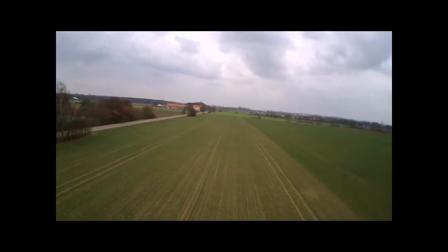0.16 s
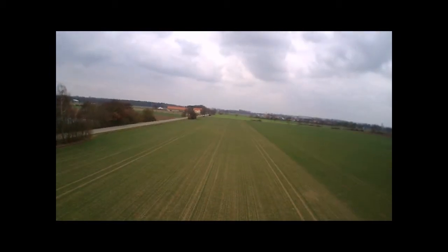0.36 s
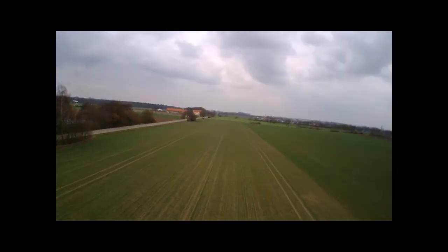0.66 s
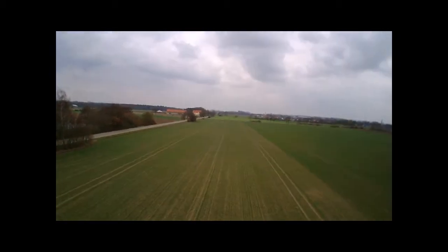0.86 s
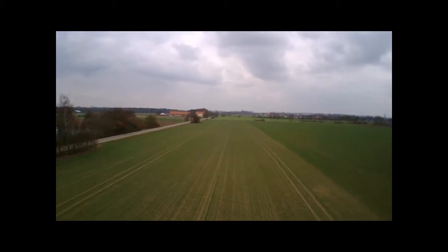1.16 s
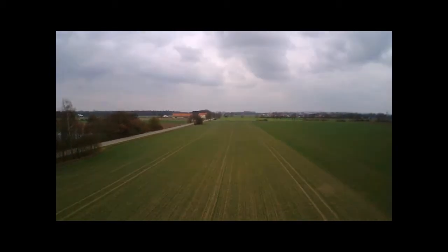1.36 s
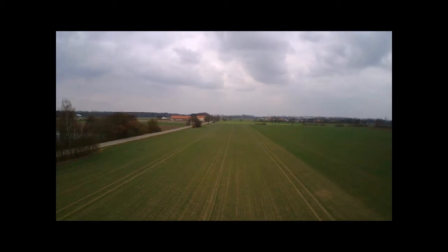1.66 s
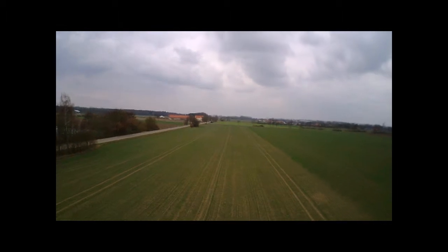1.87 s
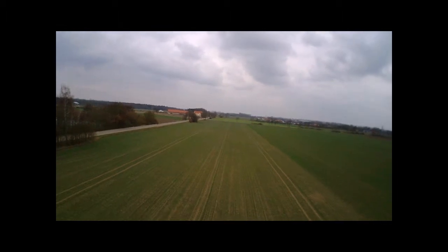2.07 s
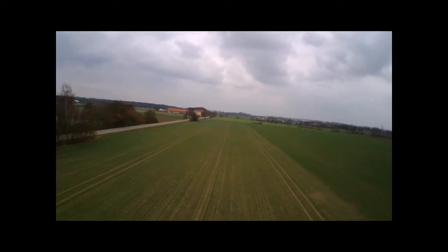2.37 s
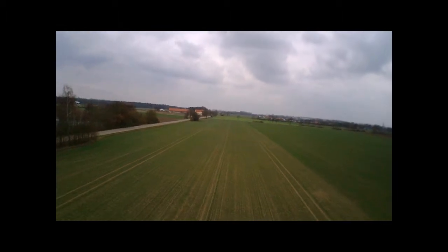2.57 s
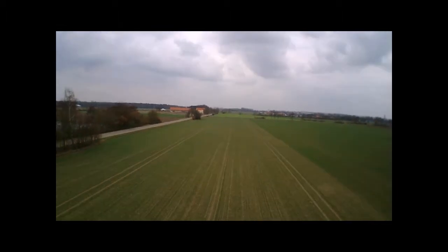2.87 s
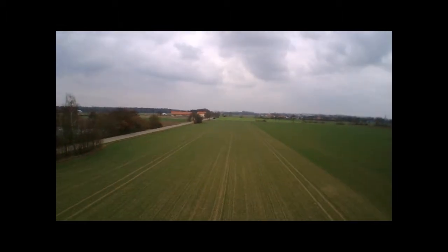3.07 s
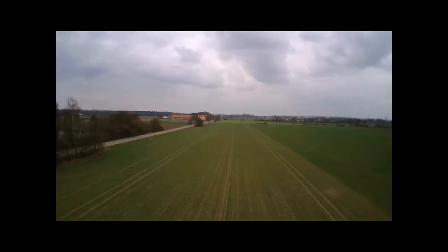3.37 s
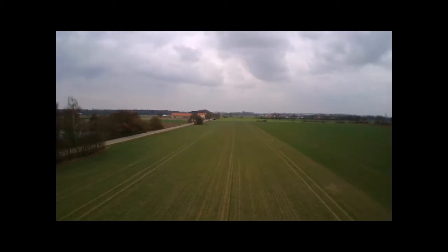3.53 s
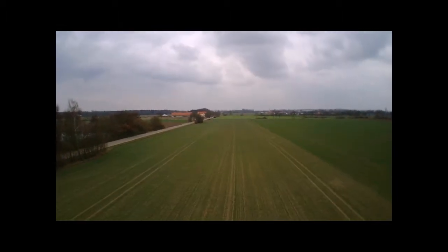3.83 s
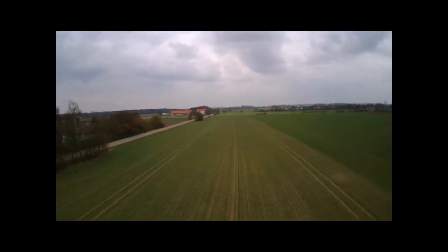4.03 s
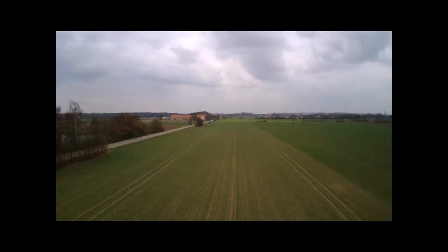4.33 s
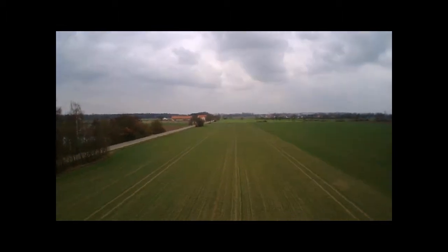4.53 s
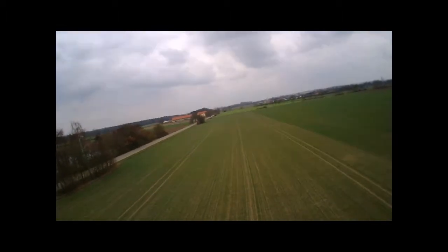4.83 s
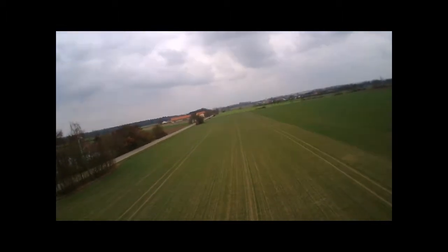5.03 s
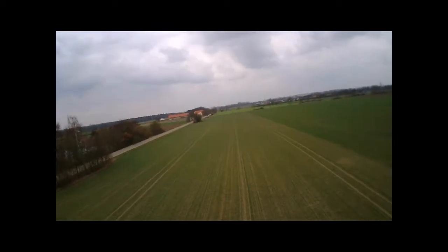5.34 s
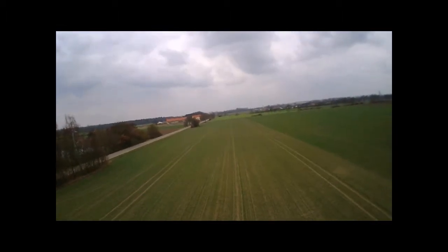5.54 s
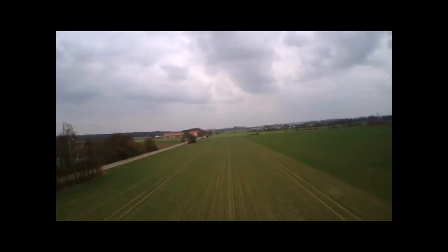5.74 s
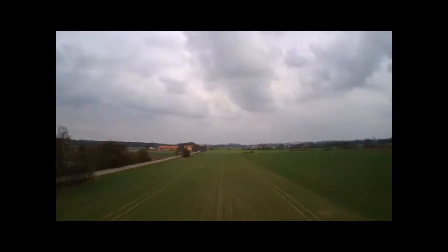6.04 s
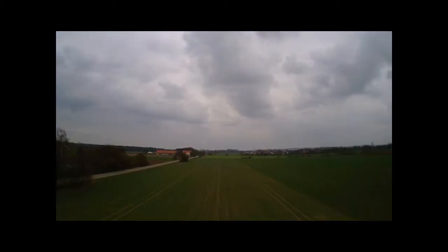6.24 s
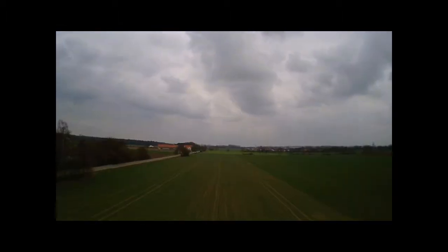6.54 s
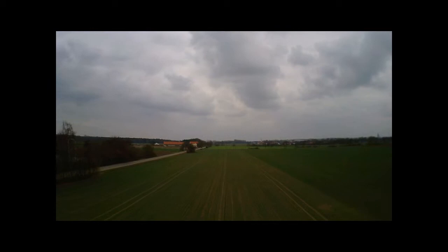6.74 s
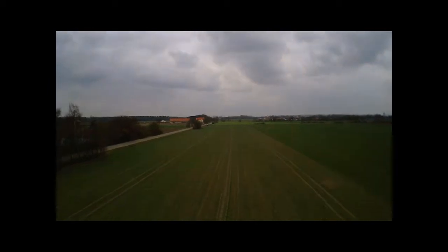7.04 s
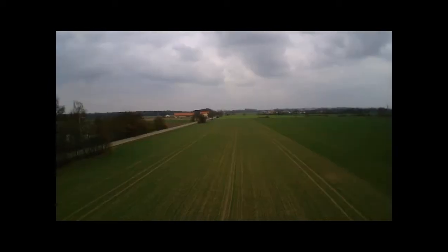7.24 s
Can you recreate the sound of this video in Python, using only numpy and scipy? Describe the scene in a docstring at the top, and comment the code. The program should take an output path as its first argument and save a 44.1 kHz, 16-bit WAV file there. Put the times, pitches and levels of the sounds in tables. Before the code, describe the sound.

For about 7.4 seconds a quadcopter drone flies over open fields, heard very close from the camera on its frame. Four two-bladed rotors give a steady low hum around 130 to 150 Hz, slightly detuned so they beat and throb, with buzzing overtones, noisy blade wash and a hoarse rasp around 2 kHz. From 0 to 1.5 s the pitches shift restlessly, with brief wind puffs and a cluster of tiny mount ticks near 0.85 s. It is calmer around 2.3 s, with a faint tick, then a rougher swell near 3 s. A click at 4.7 s precedes a quick steering wobble and a puff; another tick comes at 5.9 s. Near 6.3 s the hum dips sharply and surges back as some motors speed up. A gust and double tick arrive at 7.1 s, and the buzz continues to the end. Dry, muffled treble, faint hiss and overload crackle.

```python
"""Four two-bladed rotors of a quadcopter over open fields, heard from the camera on its frame.
They turn at slightly different speeds and beat: sine hum, overtones through the frame, and a rasp
shaken out of the housing at each blade pass. Filtered noise makes the blade wash and a little wind;
damped sines make the ticks of the mount. The loudest crests overload the recorder."""
import sys
import numpy as np
from scipy import signal
from scipy.fft import rfft, irfft, next_fast_len
from scipy.io import wavfile

SR = 44100
rng = np.random.default_rng(int(sys.argv[2]) if len(sys.argv) > 2 else 0)


def dump(signal):
    """Clip the signal to [-1, 1] and save it as 16-bit WAV at the path in sys.argv[1]."""
    limited = np.clip(np.atleast_2d(signal).T, -1, 1)
    pcm = np.round(limited * 32767).astype(np.int16)
    wavfile.write(sys.argv[1], SR, pcm)


N = 326340
MIC_TOP_HZ = 3960


def from_db(db):
    """Decibels to gain."""
    return 10 ** (np.asarray(db) / 20)


def rms_one(x):
    """Scale to unit rms."""
    return x / np.sqrt(np.mean(x ** 2) + 1e-20)


def level_db(curve):
    """Interpolate a (time [s], level [dB]) curve at every sample."""
    time_s, db = np.transpose(curve)
    return np.interp(np.arange(N) / SR, time_s, db)


def drift(rate_per_s):
    """Slow random curve of unit rms: noise through two equal one-pole low-passes at SR / 40."""
    pole = np.exp(-80 * np.pi * rate_per_s / SR)
    noise = rng.standard_normal(N // 40 + 2002)
    slow = signal.lfilter([1], [1, -2 * pole, pole * pole], noise)[2000:]  # drop the settling
    return np.interp(np.arange(N) / 40, np.arange(len(slow)), rms_one(slow))


def coloured(x, spectrum):
    """Filter by a (frequency [Hz], gain [dB]) table, interpolated over log frequency."""
    size = next_fast_len(N)
    hz, db = np.transpose(spectrum)
    bins_hz = np.maximum(np.arange(size // 2 + 1) * SR / size, 1)
    gain = from_db(np.interp(np.log(bins_hz), np.log(hz), db))
    return irfft(rfft(x, size) * gain, size)[..., :N]


def push(middle_s, length_s):
    """A smooth rise from 0 to 1 and back (cosine squared)."""
    phase = np.clip((np.arange(N) / SR - middle_s) / length_s, -.5, .5)
    return np.cos(np.pi * phase) ** 2


def rotor_speeds():
    """Cruise speed plus steering corrections, in turns per s; one row per rotor."""
    # level flight: (rotors 1 to 4 [turns/s])
    cruise_hz = [64.272, 68.021, 73.592, 76.204]
    # smooth steering pushes: (middle [s], length [s], change of rotors 1, 2, 3, 4 [turns/s])
    corrections = [(0.0, 0.78, -2.17, 2.46, -1.22, -6.42), (0.58, 1.41, 4.38, -3.28, -1.4, -3.11),
                   (1.01, 0.56, -2.25, -0.96, -4.73, 1.39), (1.03, 1.13, 0.79, 1.76, 0.8, -3.14),
                   (1.41, 0.41, -0.5, -2.2, -0.58, -0.51), (2.17, 0.64, 2.55, 1.35, 0.68, 0.13),
                   (2.4, 1.96, 0.89, 1.29, -0.71, -0.9), (3.39, 1.07, -1.67, -1.04, -0.34, -1.27),
                   (4.43, 0.76, -0.87, 0.66, -0.9, -0.45), (4.82, 0.46, -3.22, -2.62, -1.85, 2.92),
                   (5.69, 1.54, 0.74, -1.09, -1.68, -2.38), (6.28, 1.11, -1.25, -0.42, 1.53, 5.39),
                   (6.33, 2.2, 7.34, 4.54, -1.45, -3.24), (7.14, 0.8, 1.42, 4.61, 3.63, 2.42)]
    speeds_hz = np.array(cruise_hz)[:, None]
    for middle_s, length_s, *change_hz in corrections:
        speeds_hz = speeds_hz + np.outer(change_hz, push(middle_s, length_s))
    return speeds_hz


def rotor_angle(speed_hz):
    """Integrated speed; the motor hunts ahead of and behind its commanded turn."""
    hunt_rad, hunts_per_s = 0.064, 3.5
    return 2 * np.pi * np.cumsum(speed_hz) / SR + hunt_rad * drift(hunts_per_s)


def blade_tone(angle, flutter_db):
    """Two blades pass per turn and push out a nearly pure hum."""
    return np.sqrt(2) * np.sin(2 * angle) * from_db(flutter_db * drift(2.4))


def frame_shake(angle, imbalance_db, flutter_db, wobble_rad):
    """Overtones of one rotor with jittered phase; unequal blades set the level of the odd orders."""
    # frame vibration from one rotor: (multiple of turning rate [1], relative level [dB])
    orders = [(1, -47.5), (3, -32), (4, -30), (5, -29.5), (6, -32), (7, -36.5), (8, -34.5), (9, -47),
              (10, -40.5), (11, -50.5), (12, -51.5), (13, -68.5), (14, -56), (15, -60), (16, -48),
              (17, -59), (18, -57), (19, -56.5), (20, -45)]
    shake = np.zeros(N)
    angle = angle + wobble_rad * drift(19)
    for order, db in orders:
        gain = from_db(db + imbalance_db * (order % 2) + flutter_db * drift(5.8))
        shake += np.sqrt(2) * gain * np.sin(order * angle + rng.uniform(0, 2 * np.pi))
    return shake


def blade_rasp(angle, sharpness, unequal, rough, orders=60):
    """A burst at each blade pass: partly the same chatter every turn, partly fresh turbulence."""
    turn = rms_one(irfft(np.exp(2j * np.pi * rng.random(orders)), 1024))
    chatter = np.interp(angle / (2 * np.pi) % 1, np.linspace(0, 1, len(turn)), turn)
    lowpass = signal.butter(2, MIC_TOP_HZ, fs=SR, output="sos")
    turbulence = rms_one(signal.sosfilt(lowpass, rng.standard_normal(N)))
    burst = np.exp(sharpness * np.cos(2 * angle) + unequal * np.cos(angle))
    return rms_one(burst * (chatter + rough * turbulence))


def blade_wash():
    """Turbulent wash of the blades: noise through a fixed spectrum."""
    # colour of the wash: (frequency [Hz], relative density [dB per Hz])
    wash_colour = [(60, -23), (180, -17), (245, -15.5), (330, 0.5), (390, -4), (480, -2), (590, 5.5),
                   (700, -11), (850, -15.5), (1500, -34.5), (4000, -56.5)]
    return rms_one(coloured(rng.standard_normal(N), wash_colour))


def frame_vibration(shake, air, unrest_db):
    """The frame colours the rotor shake; rough air loads the blades and raises it and the wash."""
    # how the frame carries vibration: (frequency [Hz], gain [dB])
    frame_response = [(70, -1.5), (150, -4), (190, -10), (213, 3), (235, 2), (270, 3), (345, -5),
                      (390, -5.5), (430, -0.5), (590, 1.5), (800, -3), (1400, 1)]
    calm_db, growth_per_wind, wash_db = -18, 10.7, -8.5  # wash relative to the shake
    vibration = rms_one(coloured(shake, frame_response)) + from_db(wash_db) * blade_wash()
    return from_db(calm_db + unrest_db) * (1 + growth_per_wind * air) * vibration


def housing_rasp(rasp, air, unrest_db):
    """The housing colours the rasp; rough air loads the blades and raises it."""
    # colour of the housing: (frequency [Hz], relative density [dB per Hz])
    housing_colour = [(300, -33.5), (800, -26.5), (1000, -16), (1400, -11), (1700, -6), (1950, -1),
                      (2150, 0), (2400, -4), (2750, -15), (3050, -15.5), (3400, -25.5), (3900, -19.5),
                      (4400, -22)]
    # rasp before the growth with wind: (time [s], level [dB])
    calm_level = [(0, -21), (1.0, -20), (2.7, -21), (3.9, -22), (4.7, -20.5), (5.5, -21.5), (6.3, -19.5),
                  (7.4, -21.5)]
    growth_per_wind = 2.5
    gain = from_db(level_db(calm_level) + unrest_db) * (1 + growth_per_wind * air)
    return gain * rms_one(coloured(rasp, housing_colour))


def ring(clicks, hz, t60_s):
    """A two-pole resonator: a unit click starts a decaying sine of initial height 1."""
    radius, step_rad = from_db(-60 / (t60_s * SR)), 2 * np.pi * hz / SR
    feedback = [1, -2 * radius * np.cos(step_rad), radius * radius]
    return signal.lfilter([0, np.sin(step_rad)], feedback, clicks + 1e-18)  # offset avoids denormals


def mount_ticks():
    """Each knock rings the modes of the camera mount."""
    # knocks: (time [s], strength [dB])
    knocks = [(0.852, -1.5), (.8555, -10), (0.8665, -5.5), (.871, -12), (2.339, -12), (4.703, -2),
              (5.924, -5.5), (7.1043, -2.5), (7.107, -12), (7.119, -1.5)]
    # what the mount rings with: (frequency [Hz], relative level [dB], t60 [s])
    modes = [(2360, 0, 0.01), (2540, -12, 0.0048), (3210, -13, 0.018)]
    clicks = np.zeros(N)
    for time_s, db in knocks:
        clicks[round(time_s * SR)] = from_db(db)
    return sum(from_db(db) * ring(clicks, hz, t60_s) for hz, db, t60_s in modes)


def wind_pressure():
    """Pressure envelope at the microphone: an uneven breeze with gusts on top."""
    # steady airflow: (time [s], level [dB])
    breeze = [(0, -38.5), (1.2, -38), (2.0, -41.5), (2.35, -55), (2.9, -36), (4.2, -45.5), (5.6, -52),
              (6.8, -56), (7.4, -35)]
    # gusts: (middle [s], length [s], peak added to the breeze [dB])
    gusts = [(0.066, 0.18, -41), (0.372, 0.099, -31), (0.637, 0.093, -28), (0.85, 0.42, -28),
             (2.956, 0.51, -40), (3.677, 0.073, -49), (4.945, 0.095, -31), (5.912, 0.11, -33),
             (6.204, 0.17, -36), (6.447, 0.15, -42), (7.09, 0.22, -33)]
    buffet_db, buffets_per_s = 3, 4
    air = from_db(level_db(breeze) + buffet_db * drift(buffets_per_s))
    for middle_s, length_s, db in gusts:
        air = air + from_db(db) * push(middle_s, length_s)
    return air


def wind_noise(air):
    """Low coloured noise that follows the wind pressure."""
    # wind on the microphone: (frequency [Hz], relative density [dB per Hz])
    wind_colour = [(10, 5.5), (25, -7), (50, -11), (90, -2.5), (200, -12.5), (1000, -52.5)]
    return air * rms_one(coloured(rng.standard_normal(N), wind_colour))


def scene():
    """Four rotors on one frame, with their wash, the mount and the wind."""
    # rotors: (blade tone [dB], overtones [dB], imbalance = odd orders [dB], rasp [dB]), all relative
    rotors = [(-24, -2, 1, -7), (-21.5, 0, 3, -6), (-25, 2.5, 0, -4), (-20.5, -0.5, -11, -3)]
    # hum level, rising and falling, with a brief deep dip near 6.3 s: (time [s], level [dB])
    hum_level = [(0, -2), (.7, 1.5), (1.8, -1), (2.9, 0.5), (4.0, -1.3), (5.75, -1.5), (5.9, 1.5),
                 (6.22, 1.5), (6.29, -7), (6.42, 3.5), (6.7, -2), (7.4, 1)]
    air = wind_pressure()
    unrest_db = .5 * drift(9.6)  # small flutter shared by vibration and rasp
    hum_db = level_db(hum_level)
    hum, shake, rasp = 0, 0, 0
    for speed_hz, (tone_db, overtone_db, imbalance_db, rasp_db) in zip(rotor_speeds(), rotors):
        angle = rotor_angle(speed_hz)
        hum = hum + from_db(tone_db + hum_db) * blade_tone(angle, flutter_db=-0.7)
        overtones = frame_shake(angle, imbalance_db, flutter_db=2.5, wobble_rad=0.013)
        shake = shake + from_db(overtone_db) * overtones
        bursts = blade_rasp(angle, sharpness=0.83, unequal=0.081, rough=1.0)
        rasp = rasp + from_db(rasp_db) * bursts
    frame = frame_vibration(shake, air, unrest_db)
    housing = housing_rasp(rasp, air, unrest_db)
    return (hum + frame + housing + mount_ticks() + wind_noise(air))[None]


def overload(x, top, knee):
    """Straight up to the knee, then rounded off towards the top."""
    room = max(top - knee, .005)
    excess = np.maximum(np.abs(x) - knee, 0)
    return np.clip(x, -knee, knee) + np.sign(x) * room * np.tanh(excess / room)


def record(dry):
    """Narrow-band microphone path; crests that overload after it spit faint treble crackle."""
    # treble after the overload: (frequency [Hz], gain [dB])
    treble = [(3800, 0), (4300, -10), (5500, -5), (7500, -2.5), (10000, -0.5), (16000, -2.5)]
    cutoff_hz, hiss_db = 15900, -77.5
    mic_lowpass = signal.ellip(14, .2, 90, MIC_TOP_HZ, fs=SR, output="sos")
    narrow = signal.sosfilt(mic_lowpass, dry)
    loud = coloured(overload(narrow, top=0.5, knee=0.44), treble)
    hissy = loud + from_db(hiss_db) * rng.standard_normal(dry.shape)
    final_lowpass = signal.ellip(10, .2, 80, cutoff_hz, fs=SR, output="sos")
    return signal.sosfilt(final_lowpass, hissy)


dry = scene()
out = record(dry)
dump(out)
```